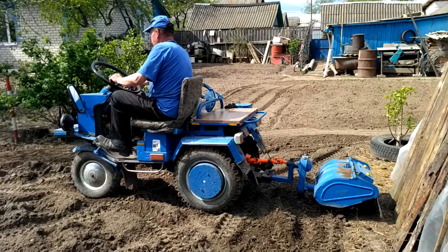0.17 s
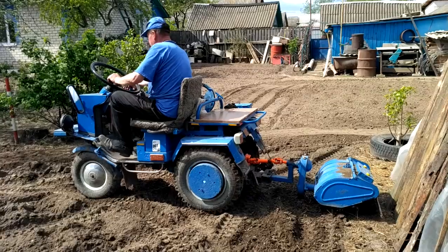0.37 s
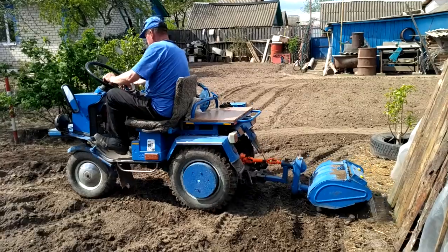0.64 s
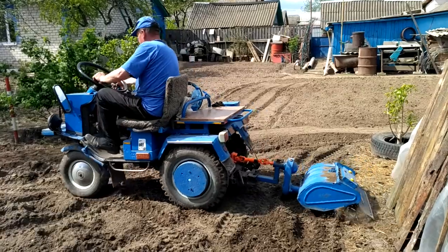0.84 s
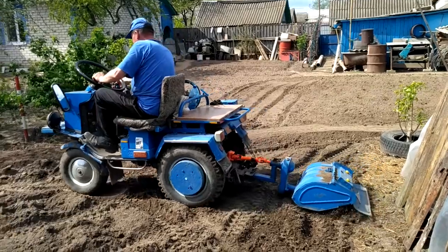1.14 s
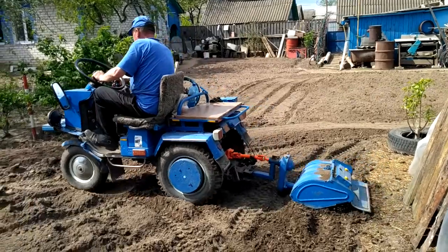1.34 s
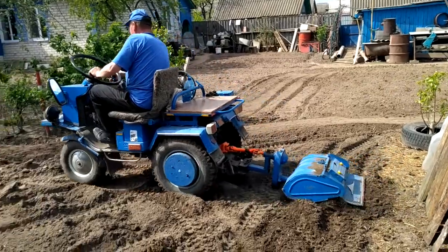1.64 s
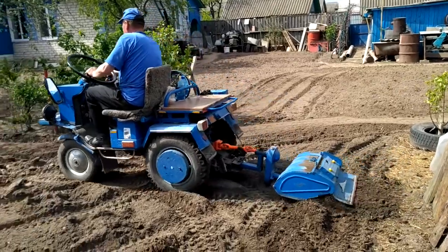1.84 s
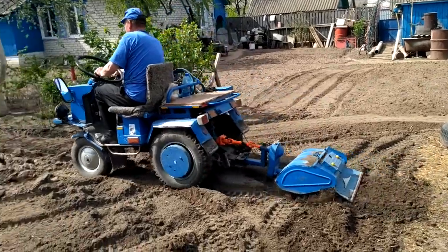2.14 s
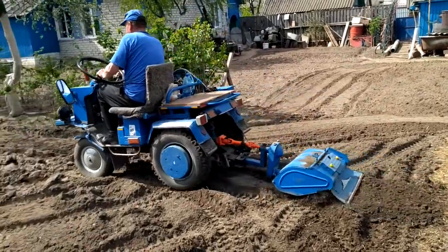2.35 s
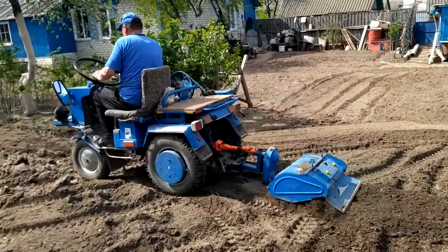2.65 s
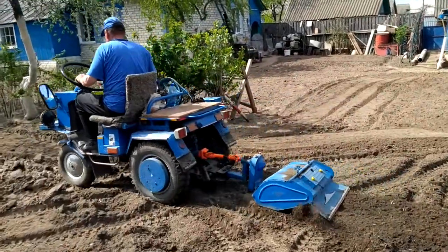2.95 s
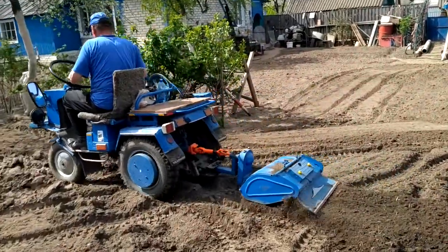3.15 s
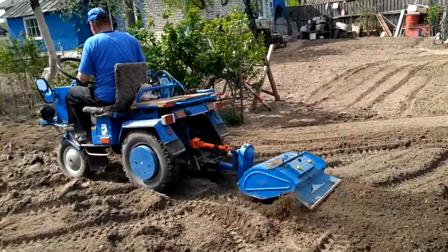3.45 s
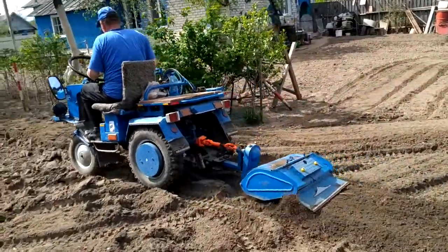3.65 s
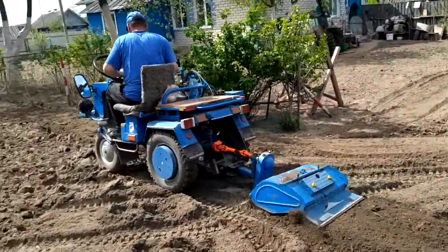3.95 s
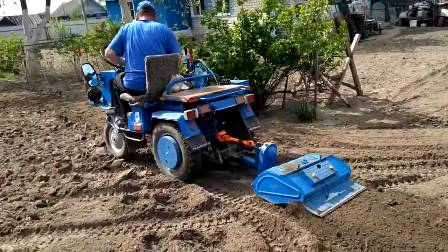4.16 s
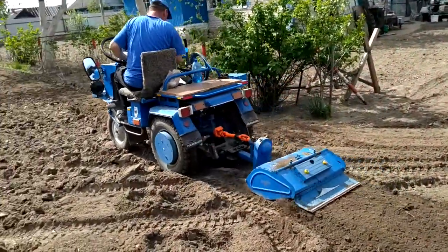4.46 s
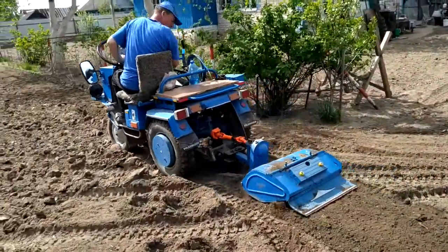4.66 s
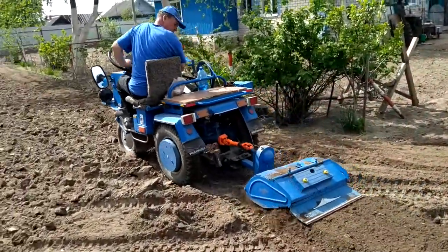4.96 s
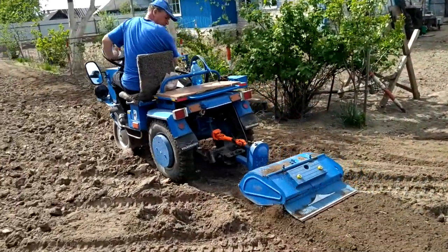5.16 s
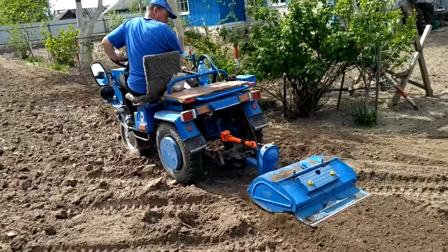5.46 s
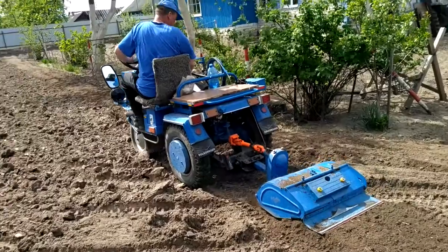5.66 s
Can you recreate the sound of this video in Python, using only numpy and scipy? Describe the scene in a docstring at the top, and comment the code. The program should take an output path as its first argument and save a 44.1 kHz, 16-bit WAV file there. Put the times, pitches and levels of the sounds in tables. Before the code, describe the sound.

Silence until about 0.55 s, when a small single-cylinder tractor engine cuts in and quickly swells. From 0.75 to 1.05 s it lugs, its rapid puffs slowing from about 25 to 18 a second, with boomy low groans, mechanical clatter and gritty earth spray. At 1.1 s it falls much quieter, with a faint low hoot. From 1.45 to 1.75 s it pulls back up to speed with a loud rapid rattle of loose steel and coarse soil noise. From 1.85 to 4.85 s it putters evenly and softly, humming, with light grit hiss, short rasps, chirps and scattered stone ticks on the steel hood. At 4.9 s everything leaps louder: heavy thumps, hard clanks and bright sizzling knocks until about 5.2 s, then fast, rough engine clatter and spraying grit to the end, slightly higher in speed. Mono, outdoors, fairly close, with short, thin wall reflections.

```python
"""In a garden, near a house wall, a small single-cylinder tractor drags a rotary tiller through the soil.
The engine lugs, recovers and later speeds up: puffs of exhaust ring its muffler, and its low tones boom.
Tiny taps ring the block and panels, and noisy grains make the churned, gritty earth.
Stones and loose steel parts knock on the tiller's hood as short chatters that ring its steel.
Bursts of noise in narrow bands add low groans, a faint hoot, rasps, bright chirps and a very high hiss."""
import sys
import numpy as np
from scipy import signal
from scipy.fft import rfft, irfft
from scipy.io import wavfile
from scipy.ndimage import uniform_filter1d

SR = 44100
rng = np.random.default_rng(int(sys.argv[2]) if len(sys.argv) > 2 else 0)


def persist_wave(psi):
    """Save psi, clipped to +-1, as 16-bit WAV."""
    counts = np.round(np.clip(psi, -1, 1) * 32767).astype(np.int16)
    wavfile.write(sys.argv[1], SR, np.atleast_2d(counts).T)


N = 256662
T = np.arange(N) / SR  # time of each sample in seconds
START_S, TOP_HZ = 0.5515, 15900  # the sound cuts in at this time and holds nothing much above this pitch

# Engine speed. Each row: time in seconds, firing rate in Hz.
ENGINE_SPEED = [(0.55, 25.7), (0.77, 23.9), (1.0, 19.0), (1.15, 18.1), (1.3, 17.9), (1.61, 22.3),
                (1.8, 23.7), (2.05, 23.1), (2.33, 22.9), (2.6, 23.8), (3.3, 24.1), (3.63, 24.2),
                (4.0, 23.5), (4.35, 24.0), (4.76, 23.9), (5.2, 24.3), (5.4, 25.5), (5.82, 25.9)]
# Exhaust strength; it follows the load and drives thump, hum and boom. Each row: time in seconds, level in dB.
EXHAUST_LEVEL = [(0.56, -58.5), (0.72, -50), (0.82, -43), (1.04, -41.5), (1.11, -57.5), (1.43, -52.5),
                 (1.53, -41), (1.68, -44), (1.85, -58), (2.3, -57.5), (2.6, -56.5), (3.45, -54.5),
                 (3.65, -57), (4.87, -58.5), (4.91, -44.5), (4.97, -42), (5.22, -47.5), (5.82, -45.5)]
# Colour of the muffler. Each row: frequency in Hz, level in dB.
MUFFLER_COLOUR = [(30, -30), (70, -8), (100, -10), (143, 2), (176, -8.5), (215, 4.5), (250, 0.5),
                  (290, 2.5), (325, -4), (380, -7), (430, -4.5), (500, -17.5), (800, -45.5)]
# Hum of the engine running free. Each row: multiple of the firing rate, level in dB.
HUM_LINES = [(1, -16), (3, -3), (6, -2.5), (7, 0.5), (8, 4), (9, -4.5), (10, -3), (11, -7), (12, -5),
             (13, -5), (14, -0.5), (15, -9.5), (16, -7.5), (17, -9.5)]
# Low tones that boom near a resonance. Each row: multiple of the firing rate, resonance in Hz,
# width in Hz, level in dB when running free, dB gained per dB of load.
BOOM_RESONANCES = [(2, 46.3, 7.8, -67, 0.98), (4, 103, 2, -56, 1.17), (5, 122.1, 12, -55, 0.5041)]
# Mechanical clatter, for block and panels. Each row: time in seconds, level in dB.
CLATTER_LEVEL = [(0.56, -64), (0.61, -56), (0.7, -54.5), (0.77, -45.5), (1.02, -44), (1.18, -59.5),
                 (1.34, -59), (1.5, -52), (1.7, -54), (1.85, -58.5), (2.5, -56.5), (3.4, -56.5),
                 (3.9, -58.5), (4.3, -55.5), (4.88, -56), (4.91, -39.5), (5.25, -43), (5.82, -44)]
# Resonances of the engine block. Each row: frequency in Hz, width setting in Hz, level in dB.
BLOCK_RESONANCES = [(599.4, 40, -6), (788.3, 89, -1), (889.4, 121, 0.5), (1055, 170, -1.5), (1293, 310, -7)]
# Resonances of guards and panels. Each row: frequency in Hz, width setting in Hz, level in dB.
PANEL_RESONANCES = [(1474, 276, -6), (1669, 190, 0.5), (1816, 100, -0.5), (1954, 133, 2.5),
                    (2212, 125, -1.5), (2613, 223, 2.5), (2872, 172, -4), (3304, 250, -2.5),
                    (3600, 550, -6.5)]
# Low bursts of noise under load, and a faint steady hoot near 400 Hz. Each row: start in seconds,
# length in seconds, centre in Hz, width as a share of the centre, level in dB before the jerks.
LOW_BURSTS = [(.555, 0.2, 132, 0.26, -51.5), (.74, .32, 112, 0.45, -46), (.77, 0.23, 233, 0.2, -46.5),
              (1.07, 0.39, 408, 0.14, -59), (1.52, 0.197, 298, 0.26, -50), (4.893, 0.12, 145, 0.26, -45.5)]
# Earth thrown by the tines, for scraping and spray. Each row: time in seconds, level in dB.
DIGGING_LEVEL = [(0.56, -66.5), (0.63, -57), (0.84, -42), (1.09, -45), (1.23, -63), (1.33, -58.5),
                 (1.43, -44.5), (1.77, -40.5), (1.84, -54.5), (2.1, -59), (2.8, -55), (3.4, -54),
                 (3.65, -57.5), (4.87, -54), (4.92, -39.5), (5.19, -39.5), (5.29, -45), (5.82, -41.5)]
# Colour of the soil scraping on the blades. Each row: frequency in Hz, level in dB.
SOIL_COLOUR = [(2800, -39), (3900, -1), (4500, -11), (5200, 3.5), (6000, 3.5), (6800, -4), (7600, 3.5),
               (9500, -15.5)]
# Colour of the spraying grit. Each row: frequency in Hz, level in dB.
GRIT_COLOUR = [(6000, -22), (7600, -20.5), (8500, -3.5), (9300, 1), (10200, -1), (11000, -6), (11900, -11),
               (13000, -5.5), (14300, -4), (15800, -5)]
# Knocks on the hood. Each row: time in seconds, then relative levels in dB of the low clank,
# the middle clash and the high sizzle, then the time in seconds to fade by 60 dB.
HOOD_KNOCKS = [(1.359, -39, -56, -51, 0.057), (1.415, -43, -56, -38, 0.07),
               (1.509, -33.5, -36, -27.5, 0.074), (1.716, -36, -38, -38, 0.088),
               (1.868, -38, -50, -50, 0.025), (2.039, -45.5, -46, -37.5, 0.062),
               (2.332, -47, -46.5, -51, 0.19), (2.577, -43, -49, -44, 0.1), (2.97, -58, -47.5, -51, 0.089),
               (3.085, -49, -55, -49, .06), (3.251, -54, -48.5, -45.5, 0.12), (3.452, -39, -49, -40, 0.11),
               (4.261, -47.5, -66, -39.5, 0.19), (4.493, -38, -46.5, -45, 0.096),
               (4.539, -47, -58, -37.5, 0.077), (4.899, -28, -49, -37, 0.1),
               (4.921, -22.5, -38, -30.5, 0.076), (4.9687, -25, -23.5, -27.5, 0.13),
               (5.073, -34.5, -41, -35, .1), (5.130, -38, -20, -11, 0.066), (5.153, -39, -34, -31, 0.073),
               (5.1746, -23.5, -26, -31, 0.048), (5.444, -45, -37, -32, 0.06)]
# Ringing tones of the steel hood and tines. Each row: frequency in Hz, level in dB, seconds to fade by 60 dB.
HOOD_TONES = [(1790, -5, .04), (1980, 0, .08), (2530, -6, .03), (2720, -7, .03), (3260, -4, .05),
              (3520, -6, .03), (3813, -5, .05), (4887, -5, .05), (5250, -3, .03), (5650, -3, .025),
              (6045, -5, .07), (6240, -8, .06), (8260, -5, .06), (8844, -3, .05), (9076, 0, .035),
              (9350, -2, .04), (9750, -4, .02), (10300, -5, .02), (14266, -7, .04)]
# Colour of the crack when steel is struck. Each row: frequency in Hz, level in dB.
CRACK_COLOUR = [(700, -5), (1900, 17), (3500, 1.5), (5500, -2), (6800, 1.5), (8200, -5), (9300, 12.5),
                (10400, 5), (11800, -2.5), (13000, 3), (15800, 0.5)]
# Rasping bursts and short bright chirps of band-limited noise, and a very high hiss that tops
# sharp knocks. Each row: start in seconds, length in seconds, centre in Hz,
# width as a share of the centre, level in dB before the jerks.
BRIGHT_BURSTS = [(1.74, 0.36, 1880, 0.12, -55.5), (1.74, 0.075, 9350, 0.16, -44.5),
                 (1.82, 0.704, 5870, 0.15, -59), (2.329, 0.12, 8660, 0.13, -44.5),
                 (2.388, 0.07, 2440, 1, -46), (2.45, 0.18, 1670, 0.29, -50.5),
                 (2.501, 0.083, 705, 0.22, -54), (2.732, 0.036, 787, 0.15, -48.5),
                 (2.87, 0.15, 6300, 0.27, -61.5), (3.082, 0.041, 10300, 0.092, -45),
                 (3.45, 0.039, 5800, 0.12, -48.5), (3.456, 0.038, 14200, 0.12, -42),
                 (4.5, 0.077, 6300, 0.29, -53.5), (4.76, .1, 6470, 0.25, -55), (4.9, 0.13, 1960, 0.14, -49),
                 (4.97, .025, 14000, 0.18, -26.5), (5.16, 0.064, 8700, 0.094, -32),
                 (5.312, 0.054, 910, .2, -41)]
# Strength of a rattle knock. The values: clank, clash and sizzle, each in relative dB.
RATTLE_LEVELS = (-40, -47, -29)
# Typical strength of a small stone. The values: clank, clash and sizzle, each in relative dB.
STONE_LEVELS = (-47, -65, -67)

CRANK_START = 0.0815  # place in the four-stroke cycle at time zero (0-1)
FREE_DB, FREE_HZ = -58, 22.9  # exhaust level and firing rate of the engine running free
# labour (0-1) grows with load and with lost speed
LABOUR_FREE, LABOUR_PER_DB, LABOUR_PER_HZ = 0.28, 0.043, 0.084
PUFF_SCATTER_DB, BOOM_FLICKER_DB = 2.4, 0.9
HUM_WAVER, HUM_FLICKER_DB = 0.024, 3.5  # phase waver in radians for each multiple; swell of each line
PANELS_OVER_BLOCK_DB, SOIL_UNDER_SPRAY_DB = 3, 8
KNOCK_RISE_S = 0.0011
RATTLE_START_S, RATTLE_END_S, RATTLE_RING_S = 1.464, 1.71, 0.082
STONES_PER_S, STONE_SPREAD_DB, STONE_RING_S = 4.5, 1.5, 0.039


def exhaust(cycle, rate):
    """A puff each firing and a gulp of air nearly a turn later ring the muffler; hum and boom join in."""
    exhaust_db = curves(EXHAUST_LEVEL)[0]
    load_db = exhaust_db - FREE_DB
    # a labouring engine thumps unevenly on every turn, a free one hums
    lost_hz = np.maximum(FREE_HZ - rate, 0)
    labour = np.clip(LABOUR_FREE + LABOUR_PER_DB * load_db + LABOUR_PER_HZ * lost_hz, 0, 1)
    puffs = 0
    for place, strength in ((0, np.ones(N)), (.45, 0.83 + 0.55 * labour)):
        times = strokes(cycle, place)
        late, size = rng.standard_normal((len(times), 2)).T
        sizes = np.interp(times, T, strength) * undb(PUFF_SCATTER_DB * size)
        puffs = puffs + clicks(times + 0.001 * late, sizes)
    puffs = unit(puffs)
    # the house wall returns each puff, and under load gas rushes between them
    echo = 0.2 * np.interp(T - .0115, T, puffs)
    gas = .5 * np.sqrt(labour) * rng.standard_normal(N)
    thump = unit(ring(puffs + echo + gas, response(MUFFLER_COLOUR)))
    mixed = np.sqrt(labour) * thump + np.sqrt(1 - labour) * hum(cycle)
    return mixed * undb(exhaust_db + 0.54) + boom(cycle, rate, load_db)


def hum(cycle):
    """Tones on multiples of the firing rate; each swells on its own, and the higher ones waver more."""
    out = 0
    for multiple, db in HUM_LINES:
        phase = 2 * np.pi * (multiple * cycle + rng.random()) + HUM_WAVER * multiple * wander(13)
        out = out + undb(db + HUM_FLICKER_DB * wander(4)) * np.cos(phase)
    return unit(out)


def boom(cycle, rate, load_db):
    """Low tones swell with the load and as the engine speed carries them into a resonance."""
    out = 0
    for multiple, hz, width, db, per_db in BOOM_RESONANCES:
        nearness = 1 / np.hypot(1, 2 * (multiple * rate - hz) / width)
        level = undb(db + per_db * load_db + BOOM_FLICKER_DB * wander(14))
        out = out + nearness * level * np.sqrt(2) * np.cos(2 * np.pi * multiple * cycle)
    return out


def clatter(cycle, block_db, panel_db):
    """Piston and valves tap in the block; guards and panels buzz along."""
    taps = grains(rate=900, spread_db=2.0, smooth=0.83) * beat(cycle, depth=0.26, decay=0.35)
    buzz = grains(rate=1200, spread_db=2.0, smooth=1.0) * beat(cycle, depth=0.11, decay=0.79)
    buzz = buzz * undb(0.93 * wander(40))
    block = shaken(taps, BLOCK_RESONANCES, patchy_db=2.35) * undb(block_db)
    panels = shaken(buzz, PANEL_RESONANCES, patchy_db=2.03) * undb(panel_db)
    return block + panels


def low_bursts(cycle):
    """Low groans and a faint hoot: noise in narrow bands that swells on each turn of the crank."""
    return bursts(LOW_BURSTS, jerk_db=4.5) * unit(1 + 0.36 * np.cos(4 * np.pi * cycle - np.pi / 2))


def tines(cycle, soil_db, grit_db):
    """Blades scrape through the earth, so that the hood rings faintly, and spray grit."""
    shake = beat(cycle, depth=0.66, decay=0.51) * undb(1.86 * wander(40))
    scraping = grains(rate=2600, spread_db=10.5, smooth=1.6) * shake * undb(soil_db)
    spray = grains(rate=2800, spread_db=0.5, smooth=1.3) * shake * undb(grit_db)
    earth = ring(scraping, response(SOIL_COLOUR)) + ring(spray, response(GRIT_COLOUR))
    return earth + undb(-8.5) * ring(scraping, hood())


def knocks(blows):
    """Each knock is a fading chatter of contacts that ring the hood and crack, in three pitch ranges."""
    t = T[:SR // 5]
    ranges = ((600, 3600), (3600, 7500), (7500, 17000))  # Hz: clank, clash, sizzle
    out = 0
    for k, edges in enumerate(ranges):
        force = np.zeros(N + len(t))
        for s, *levels, t60 in blows:
            i = int(s * SR)
            rise = 1 - np.exp(-t / KNOCK_RISE_S)
            force[i:i + len(t)] += undb(levels[k]) * rise * fade(t, t60)
        # the negative spread makes the odd contacts weaker, not stronger
        contacts = force[:N] * grains(rate=3700, spread_db=-1.0, smooth=0.9)
        band = signal.butter(3, edges, "band", fs=SR, output="sos")
        ringing = ring(contacts, signal.sosfilt(band, hood()))
        crack = ring(contacts, signal.sosfilt(band, response(CRACK_COLOUR)))
        out = out + undb(-3.5) * ringing + undb(-1.77) * crack
    return out


def hood():
    """The tiller's hood as struck steel: a sum of tones that each die away at their own pace."""
    t = T[:SR // 5]
    return sum(undb(db) * np.sin(2 * np.pi * hz * t) * fade(t, t60) for hz, db, t60 in HOOD_TONES)


def rattle(cycle):
    """The loose hood knocks once a firing while the engine pulls back up to speed."""
    place = np.interp(RATTLE_START_S - .001, T, cycle) % 1
    times = strokes(cycle, place)
    return [(s, *RATTLE_LEVELS, RATTLE_RING_S) for s in times if RATTLE_START_S - .02 < s < RATTLE_END_S]


def bright_bursts(cycle):
    """Rasps, chirps and high hiss: noise in single bands, stronger on each turn of the crank."""
    return bursts(BRIGHT_BURSTS, jerk_db=3.5) * beat(cycle, depth=0.9, decay=0.25)


def stones(count=40):
    """Small stones tick on the hood at chance moments, with uneven strength."""
    gaps, sizes = rng.random((count, 2)).T
    times = START_S + np.cumsum(2 * gaps / STONES_PER_S)
    blows = []
    for s, size in zip(times, sizes):
        if s < T[-1]:
            levels = np.array(STONE_LEVELS) + STONE_SPREAD_DB * (2 * size - 1)
            blows.append((s, *levels, STONE_RING_S))
    return blows


def yard(x, t60=0.14, wet_db=-11):
    """Walls and fences scatter a short, thin tail."""
    t = T[:SR // 2]
    tail = rng.standard_normal(len(t)) * fade(t, t60) * (t > .012)
    return x + undb(wet_db) * ring(x, tail)


def bursts(table, jerk_db):
    """Noise of jerky loudness rings in one band for each row of the table."""
    out, jerks = np.zeros(N), wander(110)
    for s, length, hz, width, db in table:
        t, i = T[:int(length * SR)], int(s * SR)
        envelope = np.clip(t / 0.001, 0, 1) * np.clip((length - t) / 0.015, 0, 1)
        noise = envelope * undb(db + jerk_db * jerks[i:i + len(t)]) * rng.standard_normal(len(t))
        near, far = 1 + width / 2, 1 + 2 * width
        body = response([(hz / far, -20), (hz / near, 0), (hz * near, 0), (hz * far, -26)])
        sound = signal.fftconvolve(noise, body / np.linalg.norm(body))
        out[i:i + len(sound)] += sound
    return out


def shaken(force, resonances, patchy_db):
    """A force rings several resonances, each swelling and fading on its own; rms 1."""
    out = 0
    for hz, width, db in resonances:
        # the filter is applied twice for steep skirts, which also narrows it
        b, a = signal.iirpeak(hz, hz / (2 * width), fs=SR)
        ringing = unit(signal.lfilter(b, a, signal.lfilter(b, a, force)))
        out = out + undb(db + patchy_db * wander(24)) * ringing
    return unit(out)


def beat(cycle, depth, decay):
    """Shaking that leaps on each turn of the crank and dies away (decay in turns); rms 1."""
    return unit(1 + depth * np.exp(-(2 * cycle % 1) / decay))


def strokes(cycle, place):
    """Times at which the engine passes a place (0-1) in its four-stroke cycle."""
    return np.interp(np.arange(int(cycle[-1])) + place, cycle, T)


def clicks(times, sizes):
    """Single impulses at the given times."""
    return np.bincount(np.clip(times * SR, 0, N).astype(int), sizes, N + 1)[:N]


def grains(rate, spread_db, smooth):
    """Many tiny impacts a second, of uneven size, over a share of smooth noise; rms 1."""
    sizes = undb(spread_db * np.minimum(rng.exponential(size=N), 4)) * rng.choice([-1, 1], N)
    impacts = unit(sizes * (rng.random(N) < rate / SR))
    return unit(impacts + smooth * rng.standard_normal(N))


def response(spectrum, size=8192):
    """The sound of one tap on a body with the given (Hz, dB) colour, starting at once."""
    hz, db = np.transpose(spectrum)
    bins = np.maximum(np.arange(size // 2 + 1) * SR / size, 1)
    skirts = 24 * np.abs(np.log2(bins / np.clip(bins, hz[0], hz[-1])))  # 24 dB an octave beyond the ends
    # folding the cepstrum gives minimum phase: no sound before the tap
    cepstrum = irfft(np.log(undb(np.interp(np.log(bins), np.log(hz), db) - skirts)))
    cepstrum[1:size // 2] *= 2
    cepstrum[size // 2 + 1:] = 0
    return irfft(np.exp(rfft(cepstrum)))


def ring(x, body):
    """Let x excite a body, given as the sound of one tap; white noise keeps its level."""
    return signal.fftconvolve(x, body / np.linalg.norm(body))[:N]


def fade(t, t60):
    """A smooth decay that loses 60 dB in t60 seconds."""
    return np.exp(-np.log(1000) * t / t60)


def wander(rate):
    """Smooth chance with rms 1, changing about rate times a second."""
    k = int(SR / rate)
    steps = np.repeat(rng.standard_normal(N // k + 1), k)
    return unit(uniform_filter1d(steps, k)[:N])


def curves(table):
    """The columns of a timed table, one value per sample."""
    s, *columns = np.transpose(table)
    return [np.interp(T, s, c) for c in columns]


def unit(x):
    """Scale to rms 1."""
    return x / np.sqrt(np.mean(x ** 2))


def undb(db):
    """Decibels to gain."""
    return 10 ** (np.asarray(db) / 20)


def scene():
    """Engine and tiller follow one crankshaft; one cycle is one firing, or two turns of the crank."""
    rate = curves(ENGINE_SPEED)[0]
    cycle = CRANK_START + np.cumsum(rate * (1 + 0.0036 * wander(10))) / SR
    clatter_db, digging_db = curves(CLATTER_LEVEL)[0], curves(DIGGING_LEVEL)[0]
    tractor = exhaust(cycle, rate) + low_bursts(cycle)
    tractor = tractor + clatter(cycle, clatter_db, clatter_db + PANELS_OVER_BLOCK_DB)
    earth = tines(cycle, digging_db - SOIL_UNDER_SPRAY_DB + 0.54 * wander(8), digging_db)
    bright = knocks(HOOD_KNOCKS + rattle(cycle) + stones()) + bright_bursts(cycle)
    return (tractor + earth + yard(bright))[None]


def record(dry):
    """Silence until the sound cuts in; the top is cut steeply."""
    opened = np.clip((T - START_S) / 0.0042, 0, 1)
    lowpass = signal.ellip(10, .2, 80, TOP_HZ, fs=SR, output="sos")
    return signal.sosfilt(lowpass, dry * opened)


dry = scene()
out = record(dry)
persist_wave(out)
```